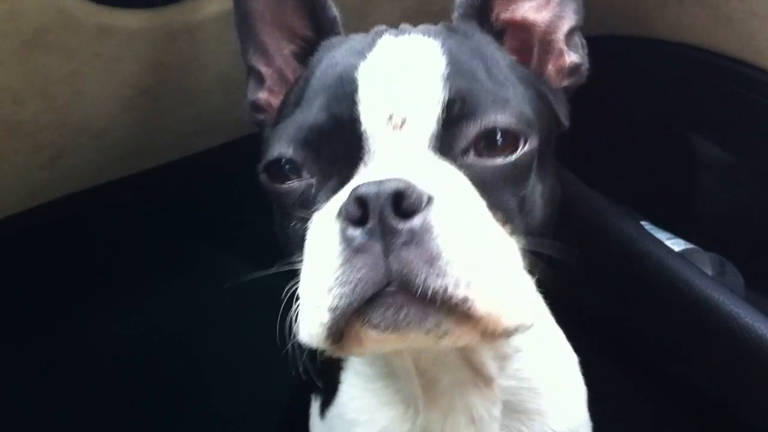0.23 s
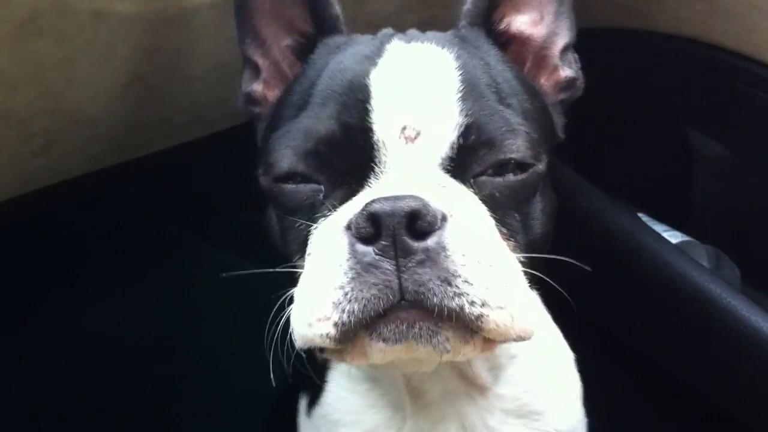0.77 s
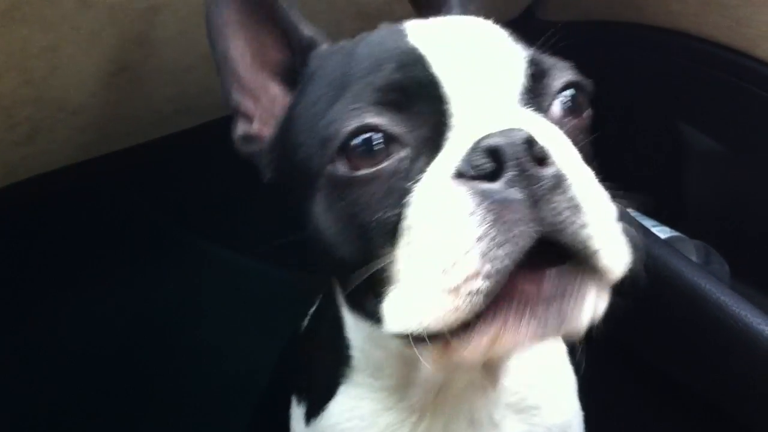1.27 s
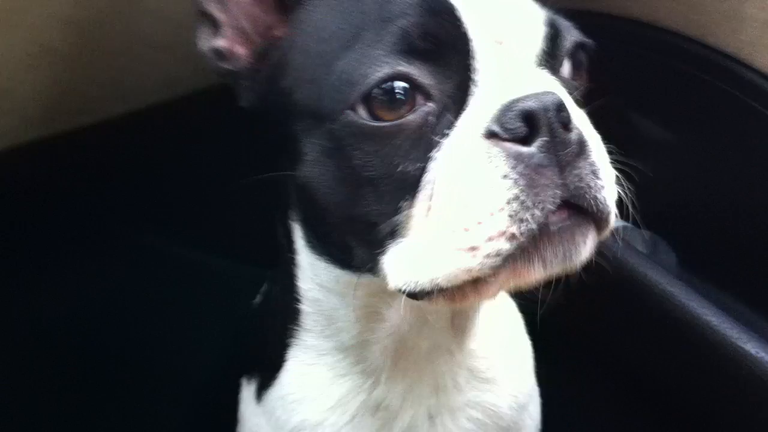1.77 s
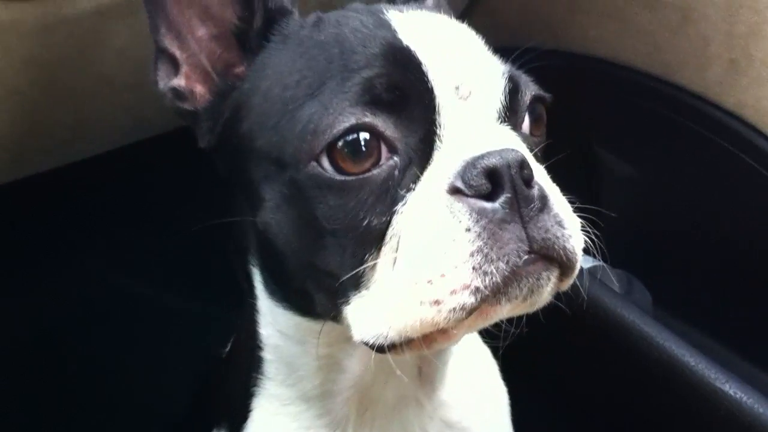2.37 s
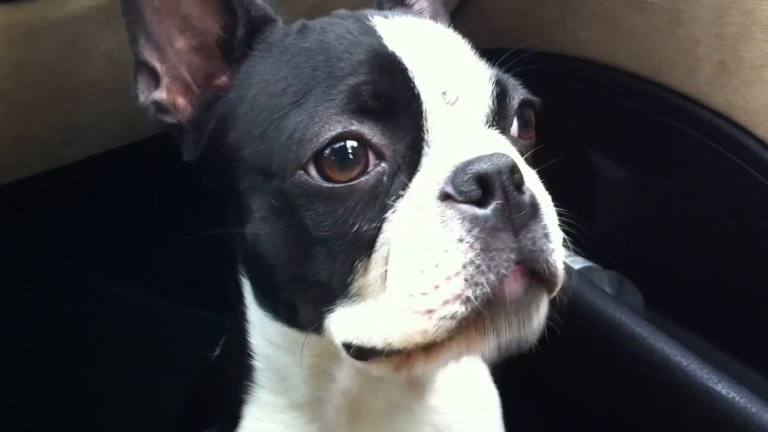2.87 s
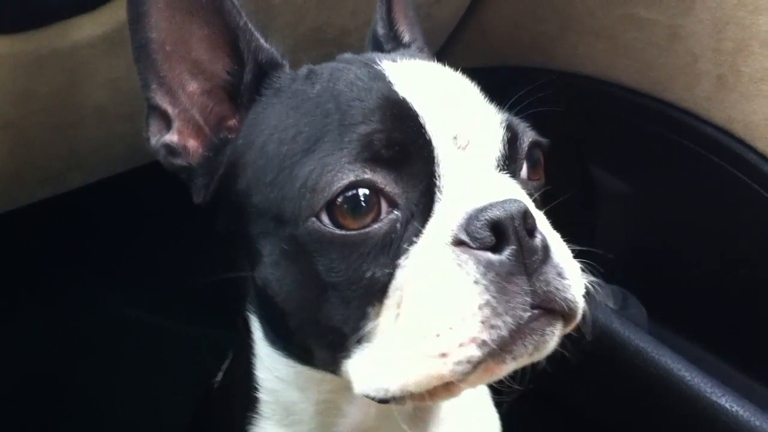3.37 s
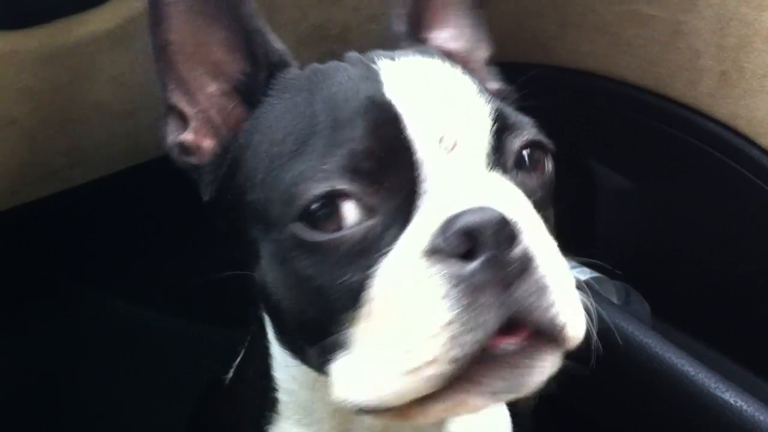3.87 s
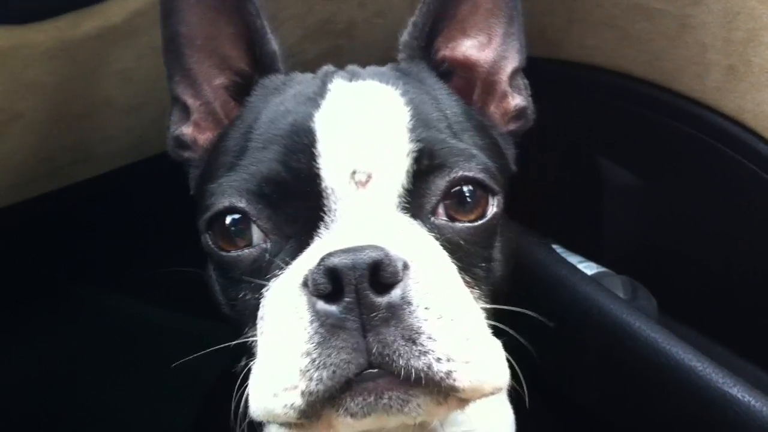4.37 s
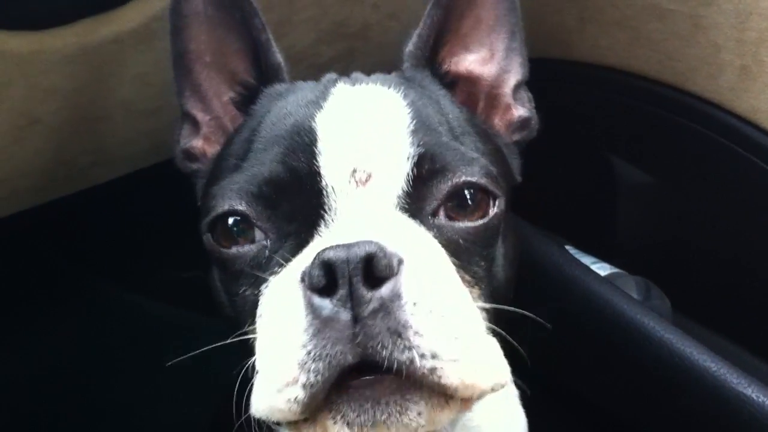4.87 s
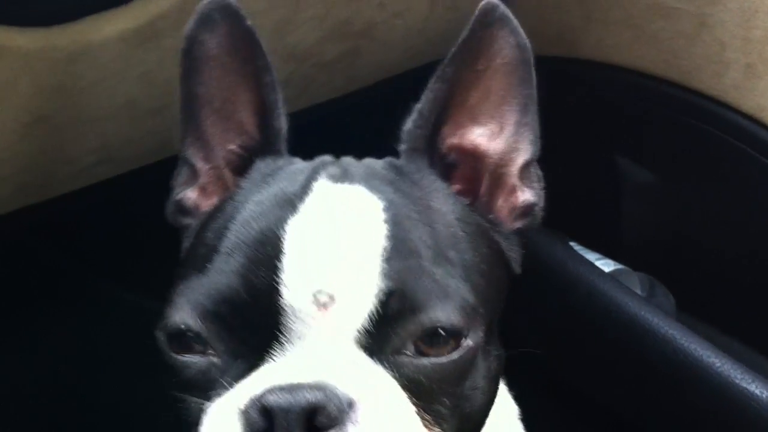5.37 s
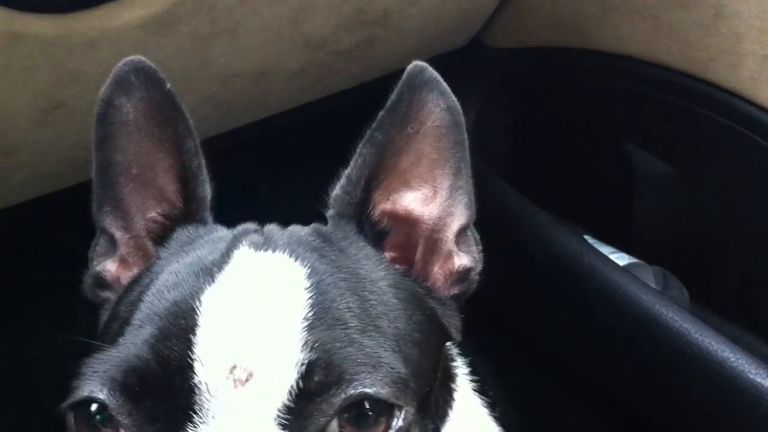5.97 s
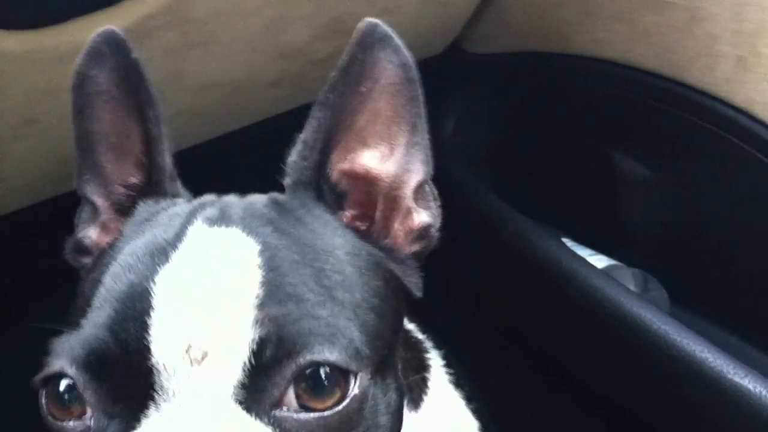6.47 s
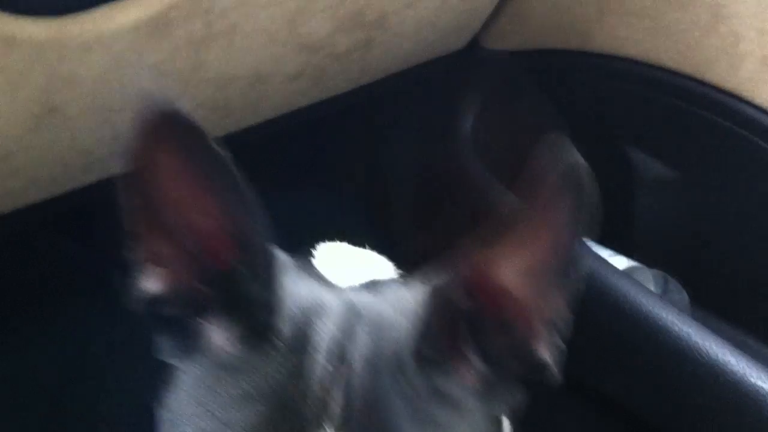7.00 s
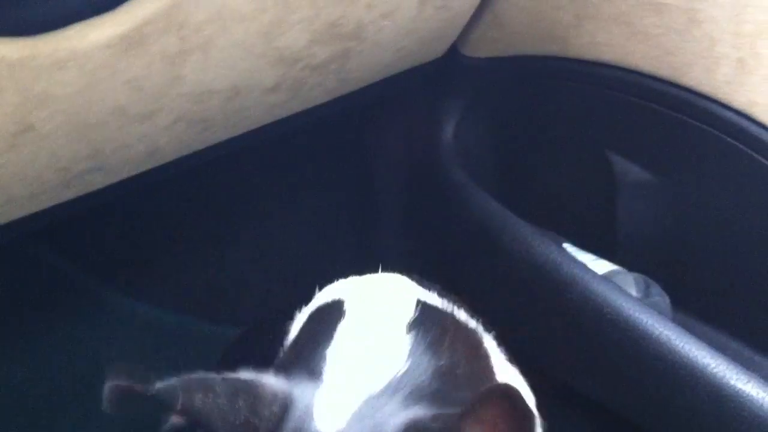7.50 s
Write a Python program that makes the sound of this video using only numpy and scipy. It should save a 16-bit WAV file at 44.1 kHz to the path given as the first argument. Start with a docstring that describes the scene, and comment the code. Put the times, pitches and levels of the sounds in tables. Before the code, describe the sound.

A puppy sits very close to the microphone in a parked car, letting out brief, bright nasal squeaks two to four times a second. Between them come lower wavering whimpers and moans that rise quickly then sag, and a few louder yips that crack upward. Small sniffs, wet mouth ticks and low puffs of nose air on the microphone fill the gaps. The cabin is dry and nearly silent.

```python
"""Puppy whining in a parked car

A puppy close to a microphone gives short, high nasal squeaks, sliding whimpers and moans, and rising yips.
The tones are sums of harmonics, shaped by the resonances of snout or throat and unsettled by random drift.
Sniffs, lip clicks and puffs of air on the microphone are coloured noise under level envelopes.
The padded cabin adds a very short ring, modelled as decaying noise, and a faint hush lies beneath.
"""
import sys
import numpy as np
from scipy import signal
from scipy.fft import rfft, irfft
from scipy.io import wavfile
from scipy.ndimage import map_coordinates

SR = 44100
rng = np.random.default_rng(int(sys.argv[2]) if len(sys.argv) > 2 else 0)


def digitize_waveform(pressure):
    """Quantize a signal to 16-bit integers and store it at the path in sys.argv[1].

    Rows of a 2-D input are taken as channels; values are limited to [-1, 1].
    """
    field = np.atleast_2d(pressure).T
    bounded = np.clip(field, -1, 1)
    quanta = np.round(bounded * 32767).astype(np.int16)
    wavfile.write(sys.argv[1], SR, quanta)


N = 341334  # length in samples

# Nasal squeaks; each but the last has a sniff after it.
# Columns: start_s, length_s, nominal pitch_hz, fundamental_db ahead of the snout, brightness_db, sniff_db
SQUEAK_EVENTS = [(-.04, 0.062, 1712, -23.5, 4.5, -54), (.2466, 0.054, 1723, -21, 4, -55.5),
                 (.502, 0.058, 1724, -21.5, 3, -54.5), (1.009, 0.067, 1716, -21, 4, -57),
                 (1.309, 0.055, 1716, -22, 2.5, -51.5), (1.575, 0.061, 1750, -21, 2.5, -48),
                 (1.862, 0.041, 1702, -25, 1, -53.5), (2.162, 0.099, 1799, -16.5, -0.5, -58),
                 (2.474, 0.054, 1725, -22, 4.5, -51.5), (2.734, 0.079, 1747, -20, 2, -55),
                 (3.131, 0.04, 1709, -22.5, 0, -67), (3.618, 0.083, 1765, -18, 0.5, -52),
                 (3.87, 0.064, 1720, -22.5, 3, -55.5), (4.173, 0.072, 1755, -19, 0.5, -41.5),
                 (4.423, 0.069, 1784, -17, 1, -49.5), (4.663, 0.062, 1760, -18.5, 1, -54.5),
                 (4.982, 0.059, 1737, -20.5, 1.5, -48), (5.516, 0.071, 1765, -18, 1, -46),
                 (5.791, 0.082, 1761, -17.5, -2, -39.5), (6.126, 0.079, 1768, -18, -2, -42.5),
                 (6.427, 0.028, 1714, -21.5, -1, -48.5), (6.794, 0.046, 1716, -20, 1.5, -47),
                 (7.252, 0.12, 1778, -18.5, 2, -49.5), (7.679, 0.073, 1772, -18, 2, -50)]
# Short whimpers, one pitch slide each.
# Columns: start_s, length_s, start_pitch_hz, end_pitch_hz, mid_level_db, pressed_db (overtones re level)
WHIMPER_EVENTS = [(0.013, 0.15, 574, 484, -54, -29), (1.443, 0.048, 1440, 1206, -38, -14),
                  (1.491, 0.065, 1014, 674, -33, -43), (1.548, 0.069, 667, 467, -40, -17),
                  (4.866, .045, 1400, 872, -36.5, -12.5), (5.284, 0.068, 987, 1034, -30, -12),
                  (7.608, 0.046, 590, 616, -42.5, -4.5), (7.64, .038, 757, 855, -29, -8)]
# Long moans, one curve each. Columns of a curve: time_s, pitch_hz, level_db
MOAN_CURVES = [
    [(.628, 390, -46), (.645, 423, -29), (.68, 661, -30.5), (.705, 745, -17.5), (.732, 990, -30),
     (.78, 940, -31), (.8, 728, -31), (.85, 756, -31.5), (.93, 702, -31), (.97, 687, -40.5), (1, 504, -51)],
    [(1.872, 900, -38), (1.89, 734, -30.5), (1.925, 1093, -36.5), (1.96, 737, -37.5), (2.06, 801, -35),
     (2.11, 629, -44), (2.19, 472, -42.5), (2.32, 387.5, -54), (2.35, 349, -47), (2.44, 361.3, -40),
     (2.54, 334, -49)],
    [(2.998, 506, -50.5), (3.035, 692, -30.5), (3.055, 892, -18.5), (3.074, 1108, -11), (3.09, 1193, -27.5),
     (3.13, 1230, -39), (3.21, 776, -28), (3.255, 730, -34.5), (3.31, 731, -26.5), (3.385, 711, -38.5),
     (3.44, 442, -47)],
    [(3.882, 522, -47.5), (3.92, 727, -32), (3.945, 805, -23.5), (3.957, 955, -24.5), (4, 787, -32.5),
     (4.037, 740, -30.5), (4.062, 944, -39), (4.085, 749, -27.5), (4.195, 700, -26.5), (4.23, 740, -27),
     (4.3, 590, -34.5), (4.36, 376, -41.5), (4.43, 280, -53.5)],
]
# How each moan opens. Columns: pressed_db (overtones re level), relax_at_s, air_rush_db
MOAN_STARTS = [(-14.5, 0.745, -38.5), (-7, 1.925, -50), (8, 3.06, -50), (4.5, 3.972, -51)]

LEAD_S = 0.04  # air leaks this long before a squeak speaks
TOP_HZ = 16000  # upper limit of the throat's overtones and of the microphone


def undb(db):
    """Level to amplitude ratio: 20 dB is a factor of ten."""
    return np.exp(np.asarray(db) * (np.log(10) / 20))


def gain_at(hz, colour):
    """Frequency response: gain of a colour table, interpolated in dB over log frequency."""
    points, db = np.transpose(colour)
    return undb(np.interp(np.log(hz + 1), np.log(points), db))


def noise(colour):
    """Spectral shaping: white noise weighted by a colour table and normalised to rms 1."""
    white = rng.standard_normal(N)
    bins_hz = np.arange(N // 2 + 1) * SR / N
    shaped = irfft(rfft(white) * gain_at(bins_hz, colour), N)
    return shaped / shaped.std()


def walk(n, rate):
    """Band-limited randomness: smooth chance with a spread near 1 and about `rate` turns a second."""
    turns = np.arange(n) * (rate / SR)
    grid = np.arange(0, turns[-1] + 1, 1 / 10)
    values = map_coordinates(rng.standard_normal(4096), [grid], order=2, mode="wrap")
    return np.interp(turns, grid, values)


def step(t, width_s):
    """Smooth transition: a tanh rise from 0 to 1 around t = 0."""
    return (1 + np.tanh(t / width_s)) / 2


def add(track, start, x):
    """Superposition: mix x into the track from the start time on, trimmed to the track's ends."""
    i = int(start * SR)
    x = x[max(-i, 0):max(N - i, 0)]
    track[max(i, 0):max(i, 0) + len(x)] += x


def squeak(length, hz, db, bright_db):
    """Self-excited oscillation: leaking air sets a tense edge vibrating, which droops as pressure runs out."""
    # Snout resonances. Columns: frequency_hz, gain_db
    snout = [(1700, -0.5), (3400, -3.5), (5200, -4), (7000, -4), (8600, -2.5), (10400, -8), (12200, -10),
             (14000, -11), (15700, -20)]
    t = np.arange(-int(LEAD_S * SR), int(2 * length * SR)) / SR
    u = np.clip(t / length, 0, 1.08)  # progress through the squeak
    settling = np.exp(-np.maximum(t, 0) / 0.0026)

    # squeaks under full length sag from the start; longer ones first rise to their note
    full_length_s, sag_hz_per_s, arch_hz_per_s = 0.066, 1600, 470
    sag_hz = sag_hz_per_s * max(full_length_s - length, 0) * u
    arch_hz = arch_hz_per_s * max(length - full_length_s, 0) * np.maximum(1 - u / 0.48, 0) ** 2
    droop_hz = 248 * u ** 4
    scoop = 1 - 0.051 * settling  # the onset starts a little flat
    jitter = 0.0009 + 0.04 * u ** 6 + 0.052 * settling
    pitch = (hz - sag_hz - arch_hz - droop_hz) * scoop * (1 + jitter * walk(len(t), 1500))
    phase = 2 * np.pi * np.cumsum(pitch) / SR

    tone = undb(db + bright_db - 41) * rng.standard_normal(len(t))  # breath within the note
    for k in range(1, 11):
        # the fundamental thins most towards the end; the top overtones also dull
        if k == 1:
            register_db = -9 * u ** 3
        elif k < 5:
            register_db = -1.8 + 0.6 * bright_db
        else:
            register_db = bright_db - 4 * u ** 4
        # higher overtones are less steady, most of all at onset and end
        waver_db = 3 * min(k / 3, 1) * walk(len(t), 54.5)
        fray_db = 5 * k / 10 * (u + settling) * walk(len(t), 220)
        level = undb(db + register_db + waver_db + fray_db)
        harmonic = np.sin(k * phase + rng.uniform(0, np.pi))
        tone += np.sqrt(2) * gain_at(k * pitch, snout) * level * harmonic

    # the leak hisses, and a faint tone at the squeak's pitch swells and fades around the onset
    flow = np.exp(-np.abs(t) / 0.12) * np.minimum(1 + t / LEAD_S, 1) ** 0.5
    lowpass = signal.butter(1, 7000, fs=SR, output="sos")
    hiss = undb(db - 27) * flow * signal.sosfilt(lowpass, rng.standard_normal(len(t)))
    onset_tone = undb(db - 17) * np.exp(-np.abs(t) / 0.005) * np.sin(phase)
    fade = 1 / (1 + np.exp((t / length - 0.87) / 0.068))
    return hiss + onset_tone + tone * step(t, 0.002) * fade


def cabin_hush():
    """Stationary noise: a faint coloured background whose level drifts slowly by about a decibel."""
    # Background spectrum. Columns: frequency_hz, gain_db
    hush_colour = [(25, -9.5), (70, -7), (130, -2), (200, 3), (300, -7), (550, -4.5), (1200, -10.5),
                   (3000, -13), (8000, -16.5), (15000, -28)]
    return noise(hush_colour) * undb(-66 + walk(N, 2))


def sniffs():
    """Turbulent flow: air hisses out with whimpers and moans, and in after each squeak but the last."""
    # Hiss spectrum at the nostrils. Columns: frequency_hz, gain_db
    nostril = [(300, -24), (900, 3), (1800, -5.5), (3500, -5), (6000, -4.5), (9000, -2), (12000, -3.5),
               (15000, -6.5), (17000, -1.5)]
    reach_s, whimper_air_db = 0.077, -54.5  # air extends this far before and after a whimper
    moan_air_db = -52.5
    breaths = [(start - reach_s, length + 2 * reach_s, whimper_air_db)
               for start, length, *_ in WHIMPER_EVENTS]
    for curve, (_, relax_at, rush_db) in zip(MOAN_CURVES, MOAN_STARTS):
        start, end = curve[0][0], curve[-1][0]
        breaths.append((start, end - start + 0.06, moan_air_db))
        breaths.append((start, 1.4 * (relax_at - start), rush_db))
    # a drawn breath fills half the pause between squeaks, up to a limit
    delay_s, pause_share, longest_s = 0.017, 0.5, 0.25
    for (start, length, *_, db), following in zip(SQUEAK_EVENTS, SQUEAK_EVENTS[1:]):
        pause = following[0] - start - length
        breaths.append((start + length + delay_s, min(pause_share * pause, longest_s), db))
    flow = np.zeros(N)
    for start, length, db in breaths:
        add(flow, start, undb(db) * np.hanning(int(length * SR)) ** 0.74)
    return flow * noise(nostril) * undb(5 * walk(N, 47))


def voice(t, hz, db, pressed_db, nasal_db, edge_s):
    """Source and filter: soft fold vibration gives a near-pure tone, and pressing adds rough overtones."""
    # Mouth resonances heard when pressed. Columns: frequency_hz, gain_db
    throat = [(700, -35), (1400, -15), (2000, -13), (2450, -1.5), (3000, -6), (3750, -4.5), (4600, -12),
              (5600, -27), (6300, -27.5), (7200, -38.5), (9000, -41.5), (15000, -49.5)]
    # Nasal resonances of the soft overtones. Columns: frequency_hz, gain_db
    nasal = [(700, 1), (1100, -5), (1450, -9), (1950, -10), (2350, -28), (3700, -35), (4400, -29),
             (5500, -36), (8000, -48), (15000, -60)]
    n = len(t)
    press = undb(pressed_db)
    strain = np.minimum(press, 1)

    # slack folds on low notes hold neither pitch nor level steady
    slack = np.minimum((600 / hz) ** 2, 2)
    # now and then the voice catches: it dips and trembles
    catch = np.minimum(slack, 1) * step(walk(n, 45) - 1, 0.1)
    drift = 0.0065 * slack * walk(n, 70)
    jitter = (0.002 + 0.015 * strain + 0.032 * catch) * walk(n, 900)
    hz = hz * (1 + drift + jitter)
    db = db + slack * walk(n, 34) - 9 * catch
    phase = 2 * np.pi * np.cumsum(hz) / SR

    # the small head radiates little bass, so low notes lean on their octave
    out = np.sin(phase) / np.sqrt(1 + (390 / hz) ** 6)
    # strained folds also rattle slowly, which makes the overtones grainy
    rattle_hz = 300 * (1 + 0.25 * walk(n, 200))
    rattle = 1 + 0.25 * np.sin(2 * np.pi * np.cumsum(rattle_hz) / SR)
    flutter_db = 3
    for k in range(2, 13):
        flutter = undb(min(k, flutter_db) * walk(n, 70) + flutter_db * strain * walk(n, 400))
        patchy = undb(4 * min(k / 4, 1) * walk(n, 30)) / (1 + (k * slack / 10) ** 2)
        pressed = press * rattle * gain_at(k * hz, throat)
        soft = undb(nasal_db) * patchy * gain_at(k * hz, nasal)
        # the folds close softly, so high orders are weak
        rolloff = (k * hz < TOP_HZ) / (1 + (k / 7.7) ** 6)
        harmonic = np.sin(k * phase + rng.uniform(0, 2 * np.pi))
        out += (pressed + soft) * flutter * rolloff * harmonic

    air = irfft(rfft(rng.standard_normal(n)) * gain_at(np.fft.rfftfreq(n, 1 / SR), throat), n)
    air /= air.std()
    # under strain, air escapes once in every cycle
    out += undb(-18) * press * np.sqrt(strain) * air * (1 + 0.53 * np.cos(phase))
    # a thin veil of breath lies over even the softest notes
    out += undb(-26.5) * air
    edges = np.clip(np.minimum(t - t[0], t[-1] - t) / edge_s, 0, 1)
    return np.sqrt(2) * out * undb(db) * edges


def whimper(length, start_hz, end_hz, db, pressed_db):
    """Frequency glide: one soft, wobbly exponential slide that is loudest in the middle."""
    t = np.arange(0, length, 1 / SR)
    u = t / length
    wobble = 1 + 0.034 * walk(len(t), 103)
    hz = start_hz * (end_hz / start_hz) ** u * wobble
    level_db = db - 16.5 * (2 * u - 1) ** 2
    return voice(t, hz, level_db, pressed_db, nasal_db=-4, edge_s=0.006)


def smacks():
    """Damped transient: parting lips and tongue give small wet ticks that decay in the mouth."""
    # Columns: start_s, level_db
    ticks = [(.155, -50), (.378, -48), (1.143, -48), (1.158, -47), (5.098, -50), (5.373, -44), (5.418, -53),
             (6.005, -47)]
    # Mouth spectrum. Columns: frequency_hz, gain_db
    mouth = [(200, -11), (900, 1), (1600, -12), (3500, -14), (7000, -14), (15000, -28)]
    envelope = np.zeros(N)
    decay = np.exp(-np.arange(SR // 20) / SR / 0.021)
    for start, db in ticks:
        add(envelope, start, undb(db) * decay)
    return envelope * noise(mouth)


def puffs():
    """Jet turbulence: air from the nose hits the microphone quickly and breaks into low eddies."""
    # Columns: start_s, length_s, level_db
    jets = [(0.268, 0.059, -50), (2.204, 0.072, -33), (2.502, 0.031, -30), (2.781, 0.046, -37),
            (3.135, 0.072, -20.5), (3.327, 0.043, -26.5), (3.66, 0.072, -21), (4.227, 0.035, -22.5),
            (4.493, 0.044, -39), (5.162, 0.058, -56), (5.852, 0.021, -34), (6.495, 0.098, -46),
            (7.699, 0.086, -41.5)]
    # Eddy spectrum. Columns: frequency_hz, gain_db
    buffet = [(25, -22), (70, -20), (130, 0), (250, -2.5), (420, -10), (700, -15.5), (1200, -21),
              (2500, -48), (8000, -54.5)]
    push = np.zeros(N)
    for start, length, db in jets:
        u = np.arange(int(2 * length * SR)) / (length * SR)
        add(push, start, undb(db) * np.minimum(u / 0.13, 1) * np.exp(-2 * u ** 2))
    return push * noise(buffet) * undb(4 * (walk(N, 260) + 0.22))


def moan(curve, opening_db, relax_at):
    """Varying fold tension: overtones change from their opening strength to a relaxed, nearly pure note."""
    relaxed_db = -27
    times, pitches, levels = np.transpose(curve)
    t = np.arange(times[0], times[-1], 1 / SR)
    hz = np.interp(t, times, pitches)
    db = np.interp(t, times, levels)
    pressed_db = opening_db + (relaxed_db - opening_db) * step(t - relax_at, 0.012)
    return voice(t, hz, db, pressed_db, nasal_db=-1.0, edge_s=0.0035)


def yip(climb_s, start_hz, end_hz, db, pressed_db):
    """Register break: the voice swells and climbs, snaps to a thin, strained register and dies away."""
    tail_s = 0.041
    t = np.arange(0, climb_s + tail_s, 1 / SR)
    climb = np.minimum(t / climb_s, 1)
    tail = np.maximum(t - climb_s, 0) / tail_s
    broken = step(t - climb_s, 0.003)
    low_hz = start_hz * (1 + 0.19 * climb ** 2)
    hz = low_hz + (end_hz - low_hz) * step(t - climb_s - 0.002, 0.008)
    # swell up to the break, step down there, fade over the tail
    level_db = db - 13 * (1 - climb) ** 2 - 9 * broken - 32.5 * tail ** 1.84
    return voice(t, hz, level_db, pressed_db + 13 * broken, nasal_db=-9.0, edge_s=0.007)


def cabin(x):
    """Reverberant decay: glass and trim return sound in milliseconds; seats soak up the treble first."""
    first_return_s, split_hz = 0.011, 2000
    t = np.arange(SR // 3) / SR
    response = np.zeros(len(t))
    # band, t60_s, level_db
    for kind, t60, db in (("low", 0.077, -19), ("high", 0.06, -23)):
        tail = rng.standard_normal(len(t)) * undb(-60 * t / t60) * (t > first_return_s)
        band = signal.butter(4, split_hz, kind, fs=SR, output="sos")
        response += undb(db) * signal.sosfilt(band, tail / np.linalg.norm(tail))
    return x + signal.fftconvolve(x, response)[:N]


def scene():
    """Superposition of puppy in the cabin, air on the microphone and hush, alike in both channels."""
    # Yips. Columns: start_s, climb_s, start_pitch_hz, end_pitch_hz, level_db,
    # pressed_db (overtones re level, before the break)
    yips = [(1.311, 0.038, 933, 1476, -12, -10.5), (4.702, 0.045, 830, 1448, -17, -2.5),
            (5.148, 0.037, 775, 1418, -10, -10.5), (5.92, 0.039, 808, 1319, -12.5, -8.5),
            (6.272, .038, 735.5, 1326, -11.5, -6)]
    puppy = sniffs() + smacks()
    for start, length, hz, db, bright_db, _ in SQUEAK_EVENTS:
        add(puppy, start - LEAD_S, squeak(length, hz, db, bright_db))
    for start, *shape in WHIMPER_EVENTS:
        add(puppy, start, whimper(*shape))
    for curve, (opening_db, relax_at, _) in zip(MOAN_CURVES, MOAN_STARTS):
        add(puppy, curve[0][0], moan(curve, opening_db, relax_at))
    for start, *shape in yips:
        add(puppy, start, yip(*shape))
    mono = cabin(puppy) + puffs() + cabin_hush()
    return np.array([mono, mono])


def record(dry):
    """Band limiting: the microphone sheds the deep bass below 85 Hz and cuts the top."""
    highpass = signal.butter(2, 85, "high", fs=SR, output="sos")
    lowpass = signal.ellip(10, 0.2, 70, TOP_HZ, fs=SR, output="sos")
    return signal.sosfilt(lowpass, signal.sosfilt(highpass, dry))


dry = scene()
out = record(dry)
digitize_waveform(out)
```